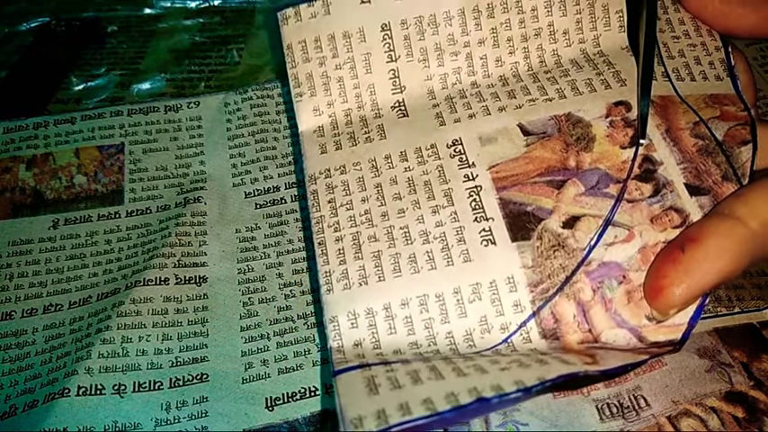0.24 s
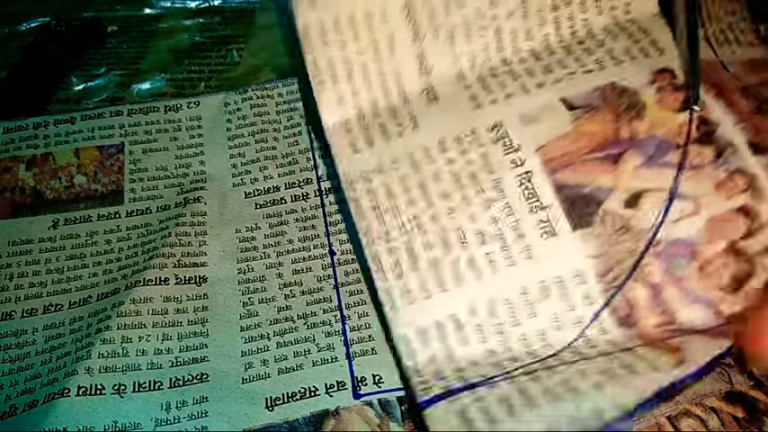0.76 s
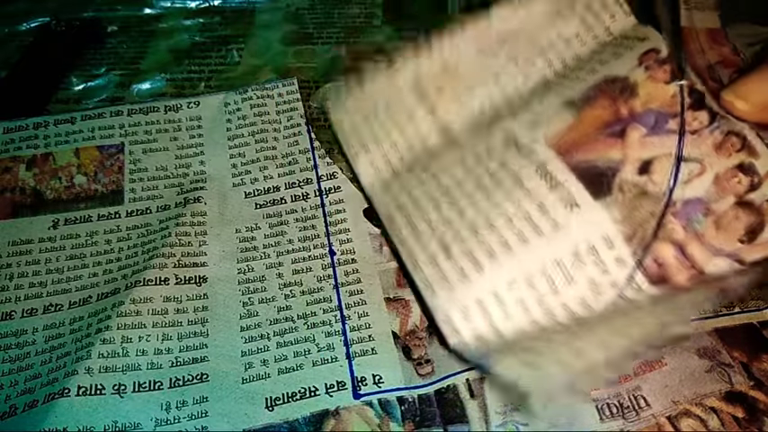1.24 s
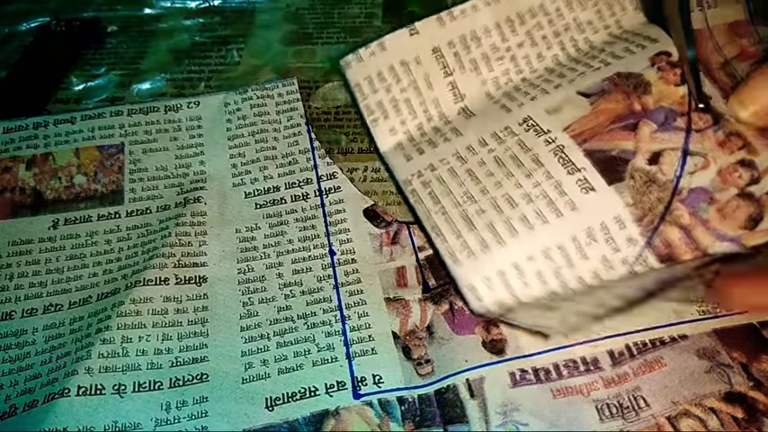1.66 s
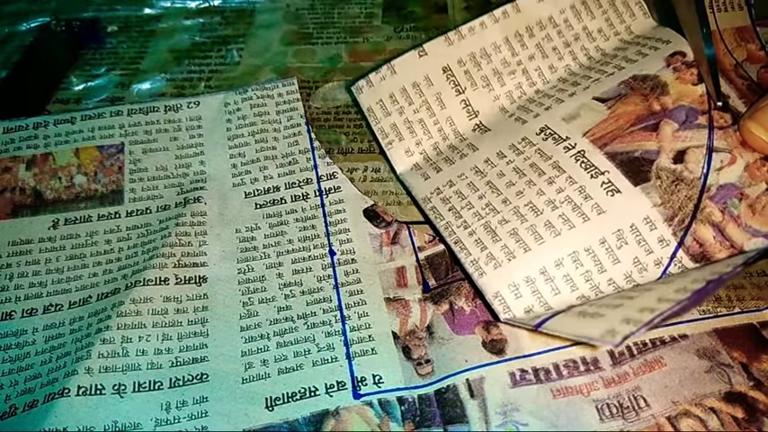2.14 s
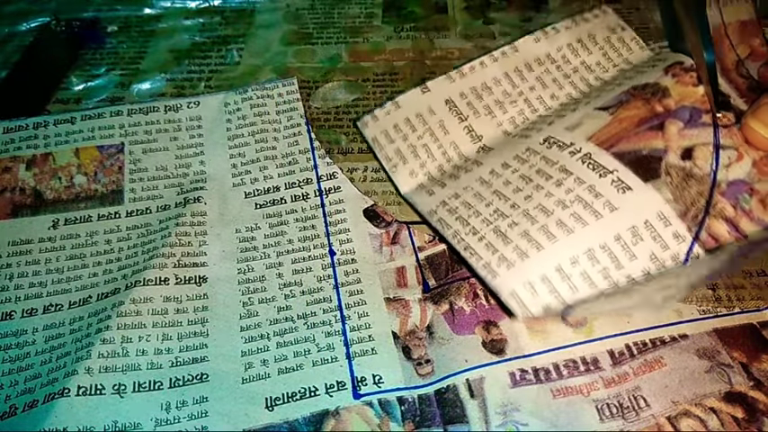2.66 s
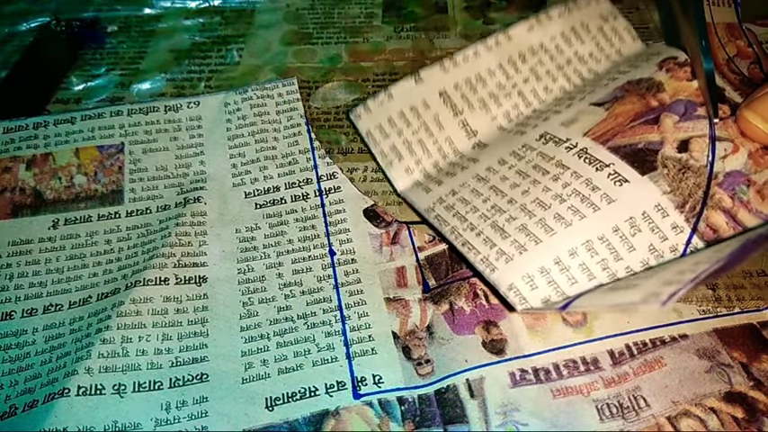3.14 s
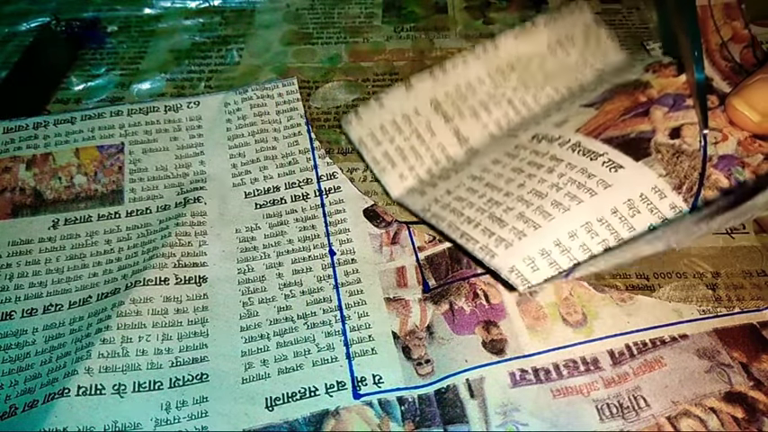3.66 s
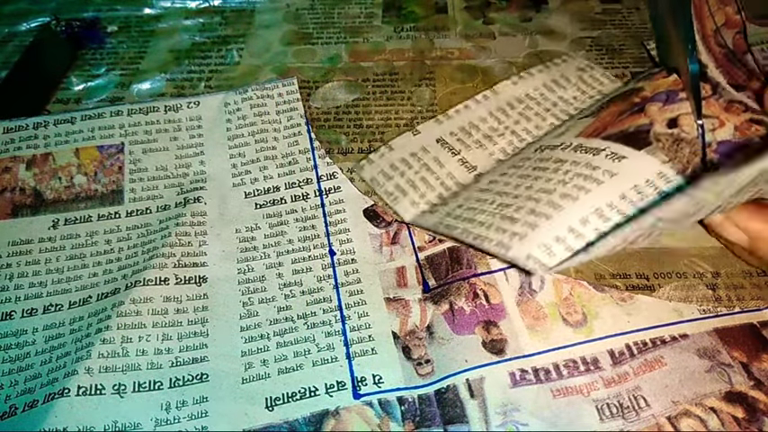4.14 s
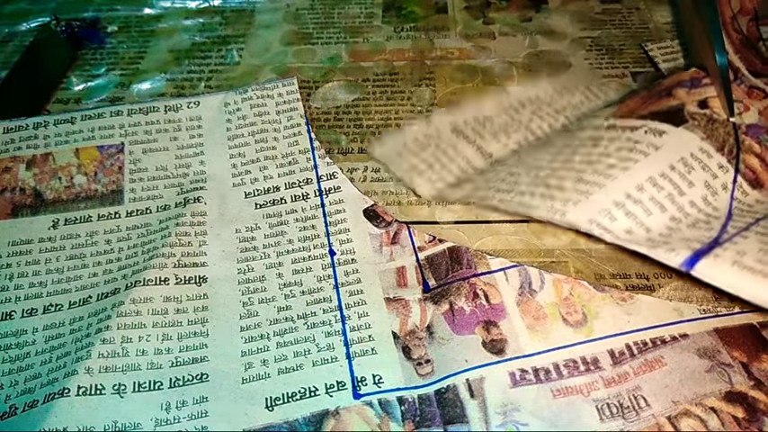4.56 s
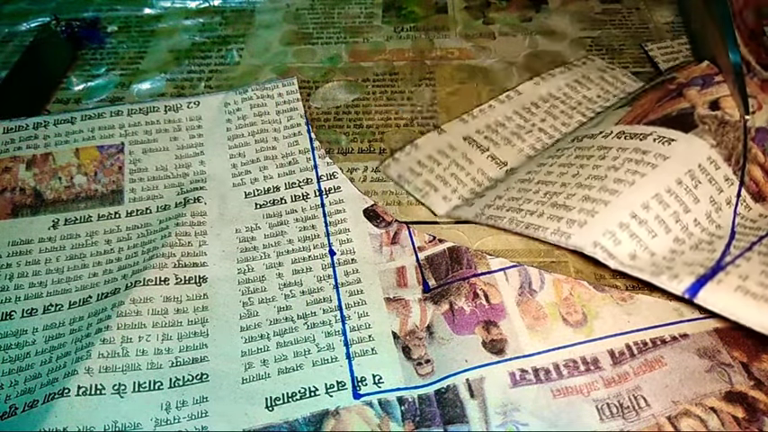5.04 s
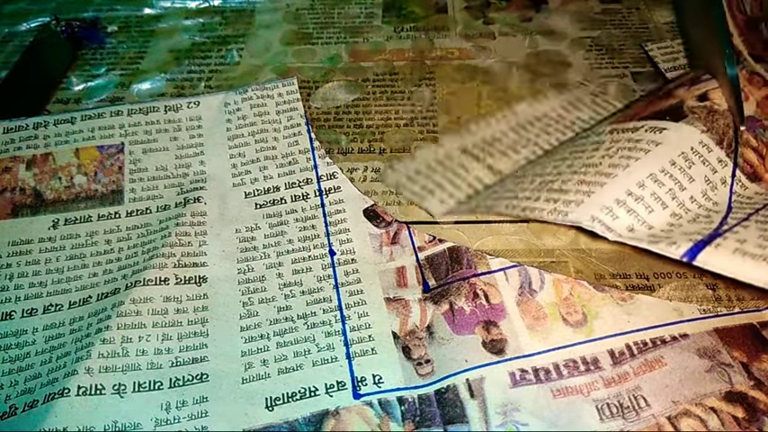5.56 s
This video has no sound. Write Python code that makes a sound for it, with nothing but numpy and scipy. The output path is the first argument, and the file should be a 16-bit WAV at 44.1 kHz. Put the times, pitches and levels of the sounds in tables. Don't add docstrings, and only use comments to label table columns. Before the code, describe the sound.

Very close, dry snipping through folded newsprint: short gritty bites first, a looser pause near two seconds, then longer crunches in quick succession. Bright cracks, metallic blade ticks and light sheet flutter mix with soft slides and small thuds. A small room adds almost no tail; low far-off traffic wavers underneath with faint microphone hiss.

```python
import sys
import numpy as np
from scipy import signal
from scipy.fft import rfft, irfft, next_fast_len
from scipy.io import wavfile
from scipy.ndimage import uniform_filter1d

SR = 44100
rng = np.random.default_rng(int(sys.argv[2]) if len(sys.argv) > 2 else 0)


def store_pcm(level_fs):
    pcm = np.round(np.clip(level_fs, -1, 1) * 32767).astype(np.int16)
    wavfile.write(sys.argv[1], SR, np.atleast_2d(pcm).T)


def volts_from_db(level):
    exponent = np.asarray(level, float) / 20
    return 10 ** exponent


N = 255339

BLADE_PER_SHEET = 0.1


def evened(x):
    return x / np.sqrt(np.mean(x ** 2) + 1e-20)


def slow(size):
    once = uniform_filter1d(rng.standard_normal(N), size)
    return evened(uniform_filter1d(once, size))


def read(points, hz):
    f, value = np.transpose(points)
    below = np.maximum(np.log2(f[0] / (hz + 1)), 0)
    above = np.maximum(np.log2((hz + 1) / f[-1]), 0)
    return np.interp(np.log(hz + 1), np.log(f), value) - 30 * (below + above)


def coloured(x, points):
    level_db = np.maximum(read(points, abs(np.fft.fftfreq(4096, 1 / SR))), -100)
    log_gain = level_db * np.log(10) / 20
    taps = np.fft.ifft(np.exp(np.conj(signal.hilbert(log_gain)))).real[:2048]
    taps /= np.linalg.norm(taps)
    return signal.oaconvolve(x, taps[None], axes=1)[:, :N]


def resonate(x, hz, width):
    turn = np.exp(2j * np.pi * np.cumsum(hz * np.ones(N)) / SR)
    r = np.exp(-np.pi * width / SR)
    return 2 * (turn * signal.lfilter([1 - r], [1, -r], x / turn)).real


def wash(points, patchy_db):
    # pitch_hz, likeness (1 same, 0 unrelated)
    likeness = [(60, 0.99), (130, 0.8), (290, 0.85), (640, 0.2), (1410, -0.3), (3100, -0.26),
                (6820, -0.029), (15000, 0.087)]
    frames, hz = N // 512 + 5, np.fft.rfftfreq(2048, 1 / SR)
    a, b, c, d, patches = rng.standard_normal((frames, len(hz), 5)).T
    patches = uniform_filter1d(patches, size=6, axis=0)
    patches = evened(uniform_filter1d(patches, size=10, axis=1))
    same = np.clip(np.interp(hz, *np.transpose(likeness)), -1, 1)[:, None]
    left, other = a + 1j * b, c + 1j * d
    z = np.array([left, same * left + np.sqrt(1 - same ** 2) * other])
    z *= volts_from_db(read(points, hz)[:, None] + patchy_db * patches)
    return evened(signal.istft(z, nperseg=2048, noverlap=1536)[1][:, :N])


def engines():
    # time_s, hum_db, upper_rumble_relative_db
    swells = [(0.0, -67, -7), (1.689, -57, -13), (2.12, -65, -3), (2.2, -55.5, -13.5), (2.35, -57.5, -12.5),
              (2.562, -58.5, -7.5), (2.8, -53, -16.5), (3.44, -59.5, -15), (4.968, -61, -15.5),
              (5.03, -64, -13.5), (5.79, -70, -6)]
    # start_hz, end_hz, wander_hz, level_db
    drones = [
        (50.6, 51, 3.89, -2.5),
        (70.8, 70, 0.972, 2.5),
        (109, 95, 5.68, 0.5),
        (182.9, 165, 6.67, -14.5),
        (359, 355, 0.99, -27.5),
        (421, 360, 4.4, -33.5),
    ]
    # pitch_hz, level_db (per Hz)
    rumble = [(15, -45), (25, -35.5), (54, -6.5), (102, -4.5), (139, -11), (308, -22), (399, -24.5),
              (454, -27.5), (608, -27.5), (1200, -37), (1560, -113), (2640, -120)]
    s, hum_db, upper_db = np.transpose(swells)
    hum_db, upper_db = (np.interp(np.arange(N) / SR, s, c) for c in (hum_db, upper_db))
    drone = np.zeros((2, N))
    for start_hz, end_hz, wander_hz, db in drones:
        pitch_hz = np.linspace(start_hz, end_hz, N) + wander_hz * slow(size=2500)
        turns = np.cumsum(pitch_hz) / SR
        apart = np.outer([1, -1], 0.0081 * slow(size=9000))
        drone += volts_from_db(db + 2.9 * slow(size=4000)) * np.cos(2 * np.pi * (turns + apart))
    hum = volts_from_db(hum_db + 1.0) * evened(drone)
    return hum + volts_from_db(hum_db + upper_db + 7.5) * wash(rumble, patchy_db=2.5)


def hiss():
    # pitch_hz, level_db (per Hz)
    hiss_spectrum = [(880, -20), (1500, -5), (4210, -11.5), (5170, -17), (5610, -13.5), (7890, -17),
                     (10400, -5), (11700, -9.5), (12800, -6), (16600, -60), (22000, -120)]
    return volts_from_db(-81.0) * wash(hiss_spectrum, patchy_db=1.7)


def controls():
    # start_s, rise_s, hold_s, effort_db, sheet_ring_relative_db
    cuts = [(0.216, 0.023, 0.0033, -56, -12), (.262, 0.035, 0.15, -50, -12.5),
            (0.538, 0.012, 0.012, -49, -2), (0.551, 0.025, 0.02, -43, -4.5),
            (0.969, 0.057, 0.027, -59, -0.5), (1.059, 0.086, 0.045, -48.5, -3),
            (1.181, 0.022, 0.02, -49.5, 3), (1.309, 0.048, 0.054, -42.5, -3.5),
            (2.208, 0.021, 0.018, -53.5, -8), (2.224, 0.031, 0.047, -45.5, -11),
            (2.485, 0.0098, 0.039, -55, -11), (2.599, 0.018, .1, -39, -6.5),
            (3.079, 0.0064, 0.15, -45, -15.5), (3.289, 0.021, 0.021, -51.5, -9),
            (3.344, 0.066, 0.038, -38, -4), (3.707, 0.0027, 0.013, -59, -3.5),
            (3.721, 0.0069, 0.084, -41.5, -11), (4.242, 0.091, 0.063, -52.5, -5),
            (4.308, .11, 0.02, -43.5, -9), (4.816, 0.014, 0.053, -44.5, -17.5),
            (5.039, 0.018, 0.021, -45, -2), (5.1, 0.011, 0.14, -47.5, -8.5),
            (5.457, 0.015, 0.0068, -50, -10.5), (5.664, 0.034, 0.086, -57, -17.5)]
    # start_s, rise_s, hold_s, effort_db, left_over_right_db
    slides = [(0.63, 0.018, 0.17, -52, 3.5), (0.815, 0.055, 0.062, -48.5, -4.5),
              (.94, 0.015, 0.075, -57.5, 0), (1.543, 0.087, 0.016, -53.5, 7.5),
              (1.719, 0.034, 0.025, -51.5, 0), (2.525, 0.03, 0.039, -65.5, 33), (3.02, .004, 0.052, -55, 1),
              (3.968, .012, 0.0053, -53.5, 0), (4.047, 0.037, 0.06, -45.5, 8.5),
              (4.156, 0.019, 0.096, -49.5, 1.5), (5.48, .01, 0.023, -61, 1)]
    # start_s, rise_s, hold_s, effort_db
    rustles = [
        (0.92, 0.02, .03, -65.5),
        (1.484, 0.036, 0.07, -74.5),
        (1.782, 0.012, 0.024, -61.5),
        (1.947, 0.08, 0.35, -78.5),
        (2.356, 0.029, 0.09, -74),
        (2.805, .05, 0.14, -80.5),
        (4.494, 0.027, 0.034, -70),
        (4.962, 0.027, 0.06, -72),
    ]
    strokes = [(*row, -9 + BLADE_PER_SHEET * row[4], -0.54, 1) for row in cuts]
    strokes += [(*row[:4], -21.5, -16.5, row[4], 1.6) for row in slides]
    strokes += [(*row, -0.5, -3.5, 0, 1) for row in rustles]
    start, rise, hold, effort_db, sheet_db, blade_db, pan_db, haste = np.transpose(strokes)[:, :, None]
    steps = np.arange(0, N / SR, .001)
    t, rise = steps - start, np.maximum(rise, .001)
    after = np.clip(haste * (t - rise - hold), 0, .5)
    fall_db = 50.5 * np.clip(t - rise, 0, abs(hold))
    fall_db += 4.5 * (1 - np.exp(-after / 0.005))
    fall_db += 152 * after + 416 * after ** 2
    swell = np.clip(t / rise, 0, 1) ** (2 * 1.4)
    power = volts_from_db(2 * (effort_db - fall_db)) * swell + 1e-30
    total = power.sum(axis=0)
    sheet_db = sheet_db - 10 * (1 - np.exp(-after / 0.019))
    blade_db = blade_db - 78 * after
    led = [(power * c).sum(axis=0) / total for c in (sheet_db, blade_db, pan_db)]
    flap_hz = 1836 - 10 * led[0]
    curves = [10 * np.log10(total), *led, flap_hz]
    return [np.interp(np.arange(N) / SR, steps, c) for c in curves]


def fibres(per_s, spread_db, clump_db):
    sizes = volts_from_db(spread_db * np.minimum(rng.exponential(1, N), 5))
    sizes *= rng.choice([-1., 1.], N)
    parting = rng.random(N) < per_s / SR
    return evened(sizes * parting * volts_from_db(clump_db * slow(size=200)))


def ring(drive, sheet_db, blade_db, pan_db):
    placed = drive * volts_from_db(np.outer([.5, -.5], pan_db))
    return np.array([placed, placed * volts_from_db(sheet_db), placed * volts_from_db(blade_db)])


def cutting():
    shear_db, sheet_db, blade_db, pan_db, _ = controls()
    drive = volts_from_db(shear_db) * fibres(per_s=18000, spread_db=3.0, clump_db=0.65)
    return ring(drive, sheet_db, blade_db, pan_db)


def snaps():
    # time_s, peak_db, sheet_ring_relative_db, rise_s
    bundles = [(0.2193, -33.5, 1.5, 0.0012), (0.271, -34, -19, 0.0016), (0.2955, -22, -4.5, 0.003),
               (0.345, -32.5, -8, 0.0033), (0.7682, -44.5, -14, 0.0018), (1.1206, -34, -11, 0.0024),
               (1.171, -22, -11, 0.0034), (1.3272, -31, -0.5, 0.0071), (1.7514, -53, 0, 0.0059),
               (2.218, -54, -8, 0.007), (2.2688, -29.5, -6.5, 0.0073), (2.5653, -86, -44.5, 0.0009),
               (2.6157, -33, -7, 0.014), (3.0866, -25, -31, 0.0025), (3.118, -28.5, -15, 0.002),
               (3.141, -31, -10, 0.005), (3.185, -29, -15.5, 0.0054), (3.3, -49, 11, 0.0028),
               (3.317, -33, -42, 0.0041), (3.3685, -32, 1, 0.0068), (3.455, -25.5, -4, 0.0045),
               (3.749, -24, -12.5, 0.0041), (3.807, -35.5, -31.5, 0.002), (4.117, -27.5, -21, 0.0085),
               (4.822, -39.5, -19, 0.0025), (4.8412, -27, -39, 0.0032), (4.8824, -57, -32, 0.0023),
               (5.0501, -36, 9.5, 0.00077), (5.116, -23, -17, 0.0033), (5.69, -49, 3, 0.0025)]
    level, sheet_db = np.zeros((2, N + SR))
    for s, db, rel_db, rise in bundles:
        at = round(s * SR)
        u = np.arange(2000) / SR / max(rise, .0005)
        level[at:at + len(u)] += volts_from_db(db - 12.5) * u * np.exp(1 - u)
        sheet_db[at:] = rel_db
    drive = level[:N] * fibres(per_s=11000, spread_db=2.0, clump_db=-2.8)
    return ring(drive, sheet_db[:N], -9.0, controls()[3])


def ticks():
    # time_s, peak_db, sheet_ring_relative_db, left_over_right_db
    cracks = [(0.2757, -31, -11, 4), (0.4216, -53, -24, -25), (0.4808, -50, -45, 11),
              (0.545, -44, -18, -18), (0.6846, -40, -40, -1), (0.7105, -57, -41, -7),
              (1.2059, -45.5, 7, -18), (1.483, -59, -34, -2), (2.2155, -38, -0.5, -0.5),
              (2.481, -58, -7, 25), (2.4924, -30.5, -2.5, -1.5), (2.5671, -42.5, -53, -20.5),
              (2.586, -54, -34, 29), (3.0246, -50, -32, 6), (3.0394, -34.5, -69, 2), (3.0948, -58, -16, -5),
              (3.121, -28, -38, 12), (3.1659, -29.5, -7.5, 11), (3.7284, -29.5, 1, 6),
              (3.7951, -31, -23, -4), (4.122, -28.5, -15, 25.5), (4.1332, -31, -43, -1),
              (4.223, -47.5, 0.5, 0), (4.358, -29.5, -2, 1), (4.8247, -37.5, -0.5, 0),
              (4.887, -29, -42, -3), (5.453, -52.5, -9, 15.5), (5.472, -28, -10, -3),
              (5.69, -34.5, -12.5, -1.5), (5.7442, -35.5, -47, -1)]
    crack, sheet_db, pan_db = np.zeros((3, N))
    s, db, rel_db, pan = np.transpose(cracks)
    at = np.round((s + 0.0012) * SR).astype(int)
    crack[at], sheet_db[at], pan_db[at] = volts_from_db(db + 8.5), rel_db, pan
    return ring(crack, sheet_db, -7.5 + BLADE_PER_SHEET * sheet_db, pan_db)


def paper_and_blades():
    # pitch_hz, level_db (per Hz)
    sheet_spectrum = [(260, -38), (450, -25), (550, -18), (623, -16), (1020, -11.5), (1450, -0.5),
                      (1780, -4.5), (2070, -4), (3300, -7.5), (4290, -36), (7260, -120)]
    # pitch_hz, level_db (per Hz)
    blade_spectrum = [(1760, -11.5), (3000, -5), (3270, -10.5), (3930, -4), (5970, -9.5), (7000, -19.5),
                      (9100, -35), (15400, -120)]
    # pitch_hz, level_db (per Hz)
    shear_spectrum = [(3820, -21), (6500, -10.5), (8060, -8), (10500, 1), (11900, -4.5), (13000, -8.5),
                      (14900, -8.5), (15900, -19), (16100, -72), (16300, -71)]
    shear, sheet, blade = cutting() + snaps() + ticks()
    sheet = coloured(sheet, sheet_spectrum)
    flap = volts_from_db(-5.0) * sheet + volts_from_db(-10.5) * resonate(sheet, controls()[-1], 750)
    blade = blade * rng.choice([-1., 1.], N)
    return coloured(shear, shear_spectrum) + flap + coloured(blade, blade_spectrum)


def reshaping(x, t60):
    blocks = np.pad(x, [(0, 0), (0, -N % 512)]).reshape(2, -1, 512)
    t = np.arange(400) / SR
    shape = (*blocks.shape[:2], 400)
    taps = rng.standard_normal(shape) * (rng.random(shape) < .3)
    taps *= volts_from_db(-60 * t / t60) * (t > .0002)
    taps /= np.linalg.norm(taps, axis=2, keepdims=True)
    rung = irfft(rfft(blocks, 1024) * rfft(taps, 1024))
    spill = np.roll(rung[:, :, 512:], 1, axis=1)
    return (rung[:, :, :512] + spill).reshape(2, -1)[:, :N]


def tail(t60, start_s, size):
    t = np.arange(size) / SR
    taps = rng.standard_normal((2, size)) * (rng.random((2, size)) < .3)
    taps *= volts_from_db(-60 * t / t60) * (t > start_s)
    return taps / np.linalg.norm(taps, axis=1, keepdims=True)


def nearby(x):
    # pitch_hz, level_db
    scatter = [(500, 10.5), (1200, -6.5), (3000, 3), (6000, 18.5), (12000, 0.5)]
    direct = np.array([x[0], np.roll(x[1], 1)])
    size = next_fast_len(N)
    f, db = np.transpose(scatter)
    share = volts_from_db(np.interp(np.log(np.fft.rfftfreq(size, 1 / SR) + 1), np.log(f), db))
    scattered = reshaping(x, t60=.007)
    both = rfft(direct, size) + share * rfft(scattered, size)
    near = irfft(both / np.sqrt(1 + share ** 2), size)[:, :N]
    echoes = tail(t60=0.03, start_s=0.005, size=4410)
    return near + volts_from_db(-5.5) * signal.oaconvolve(scattered, echoes, axes=1)[:, :N]


def bumps():
    # time_s, peak_db, pitch_hz, t60_s (time to fall 60 dB)
    pushes = [(.555, -52.5, 361, 0.11), (.56, -47.5, 448, 0.047), (.575, -51.5, 760, 0.075),
              (1.205, -24.5, 1040, 0.011), (1.225, -40, 1160, 0.036), (1.39, -66, 338, 0.19),
              (2.27, -41.5, 58.4, 0.23), (2.687, -53, 191, 0.21), (2.741, -35, 67, 0.11),
              (4.403, -55.5, 359, 0.18), (4.415, -58.5, 378, 0.23)]
    out, t = np.zeros(N + SR), np.arange(SR // 2) / SR
    for s, db, hz, t60 in pushes:
        soft_start = 1 - np.exp(-t / 0.0035)
        push = volts_from_db(db - 60 * t / t60) * soft_start * np.sin(2 * np.pi * hz * t)
        out[round(s * SR):][:len(t)] += push
    return out[:N]


def whistles():
    # start_s, end_s, pitch_hz, level_db
    tones = [
        (1.97, 2.2, 3280, -90),
        (3.86, 4.05, 3600, -84),
        (3.88, 4.04, 3230, -88),
    ]
    out, t = np.zeros(N), np.arange(N) / SR
    for start, end, hz, db in tones:
        gate = np.clip(np.minimum(t - start, end - t) / 0.0034, 0, 1)
        out += volts_from_db(db) * gate * evened(resonate(rng.standard_normal(N), hz, 24))
    return out * volts_from_db([[2.5], [-2.5]])


def starve(x, under_db, quiet_db):
    hz, _, z = signal.stft(x, SR, nperseg=1024, noverlap=768)
    power = uniform_filter1d(abs(z.mean(axis=0)) ** 2, size=8, axis=1)
    band = np.repeat(np.add.reduceat(power, np.arange(0, 513, 6)) / 6, 6, axis=0)[:513]
    around = uniform_filter1d(power, size=40, axis=0)
    busy = power[hz > 1000].mean(axis=0) > volts_from_db(2 * quiet_db)
    hz = hz[:, None]
    cheap = (hz > 2700) & (hz < 8800) | (hz > 12500)
    dip = np.log(band / around + 1e-9)
    dip -= np.median(dip[:, busy], axis=1, keepdims=True)
    masked = (dip < -under_db * np.log(10) / 10) & cheap & busy
    faint = (band < volts_from_db(2 * quiet_db - 2)) & (hz > 12900)
    faint |= (band < volts_from_db(2 * quiet_db + 44)) & (hz > 15700)
    thinned = z * np.where(masked | faint, .02, 1)
    return signal.istft(thinned, SR, nperseg=1024, noverlap=768)[1][:, :N]


def scene():
    far = engines() + whistles()
    return far + hiss() + nearby(paper_and_blades()) + bumps()


def low_pass(x):
    return signal.sosfilt(signal.butter(12, 16480, fs=SR, output="sos"), x)


def record(dry):
    thinned = starve(dry, under_db=2.3, quiet_db=-105)
    return low_pass(thinned)


dry = scene()
out = record(dry)
store_pcm(out)
```